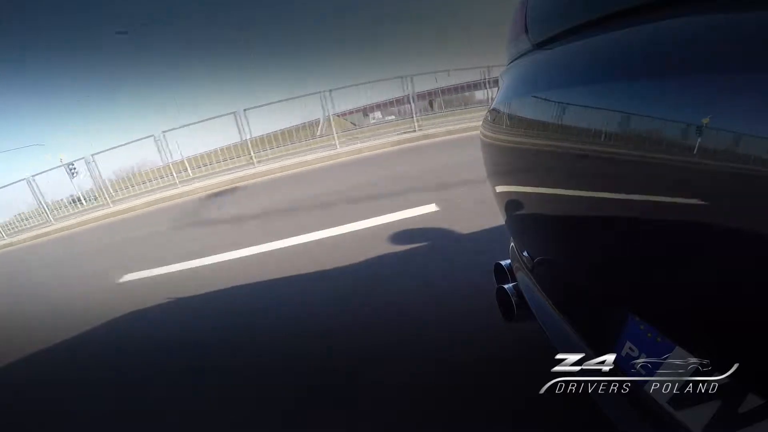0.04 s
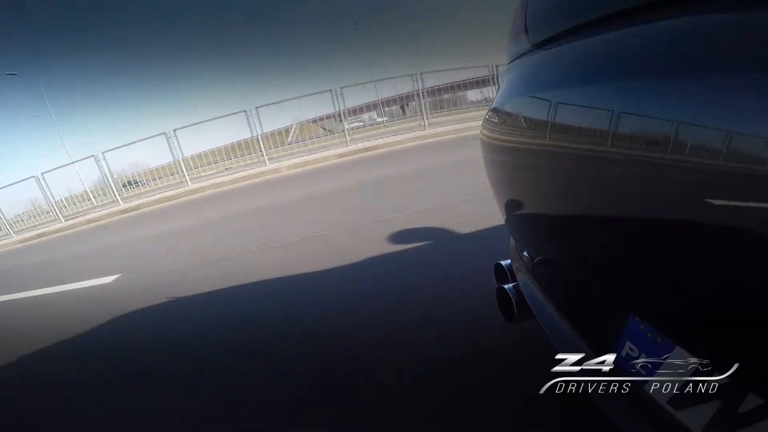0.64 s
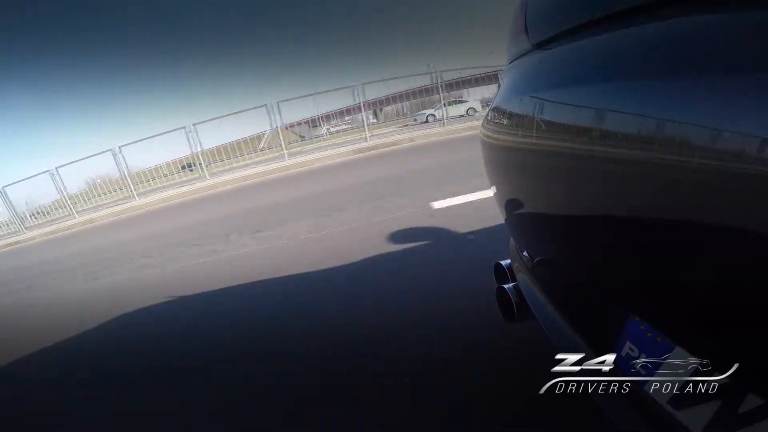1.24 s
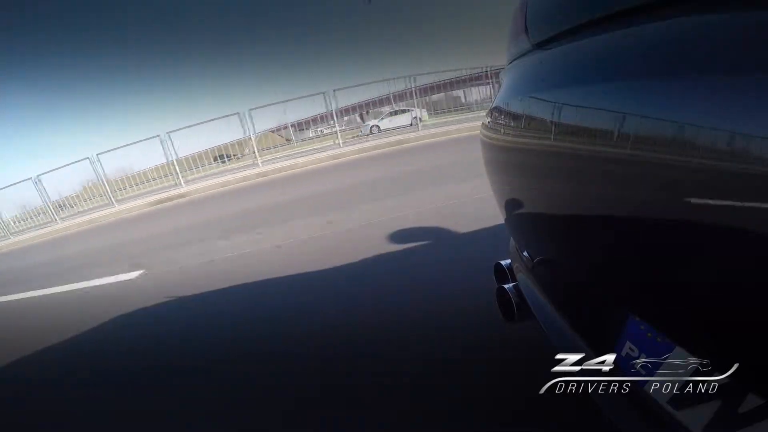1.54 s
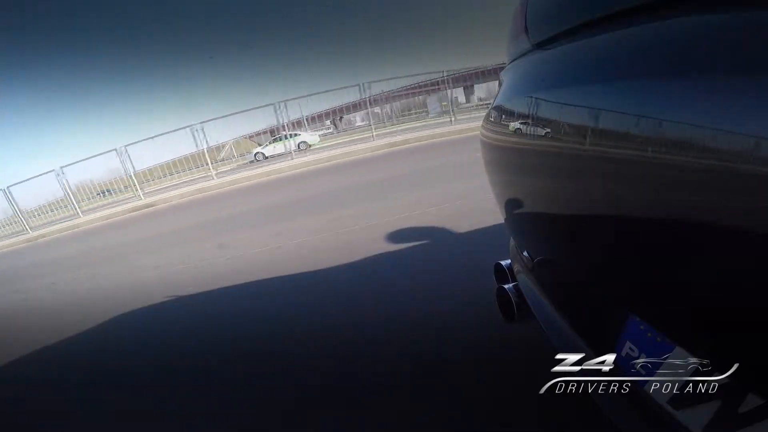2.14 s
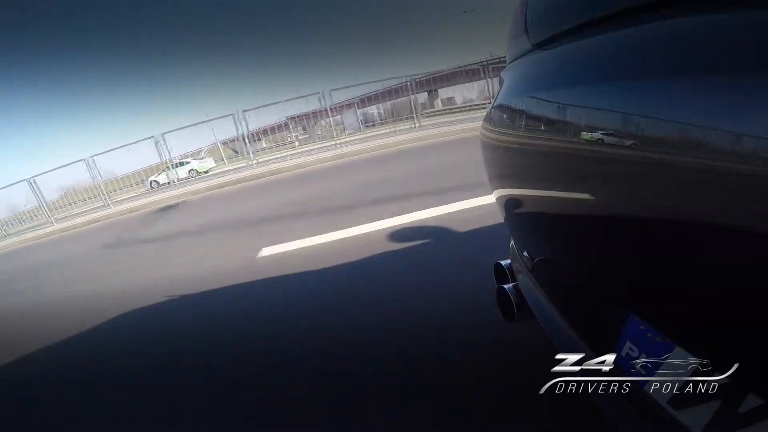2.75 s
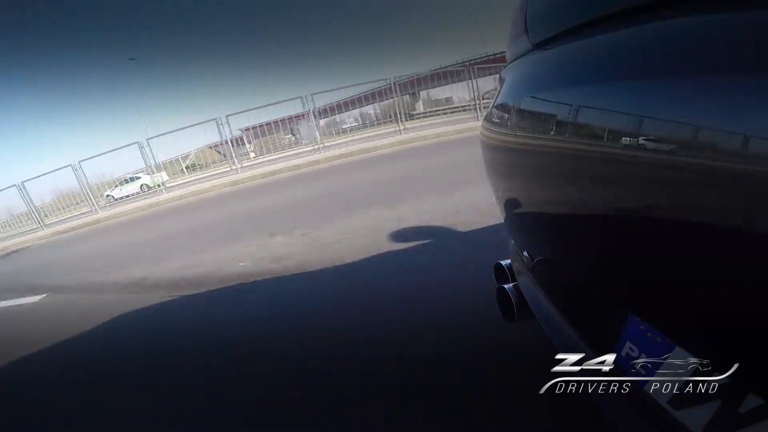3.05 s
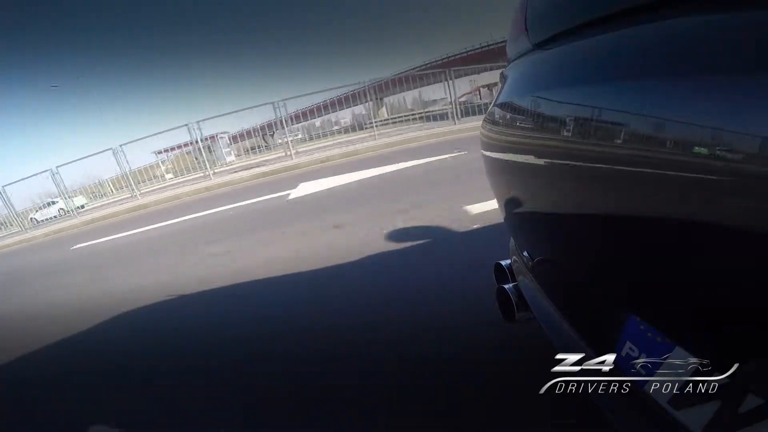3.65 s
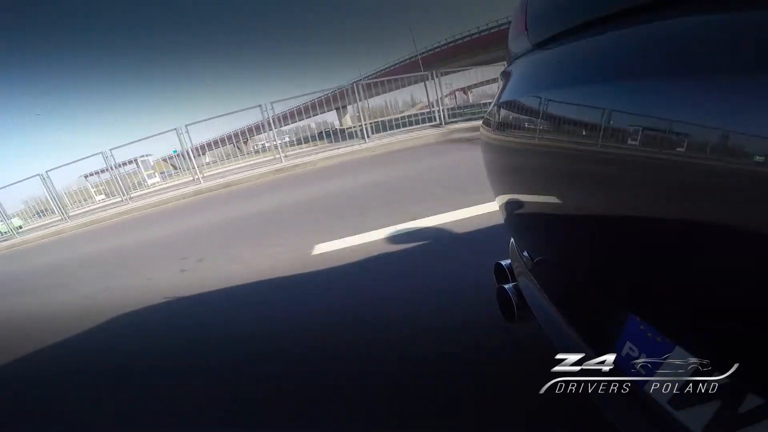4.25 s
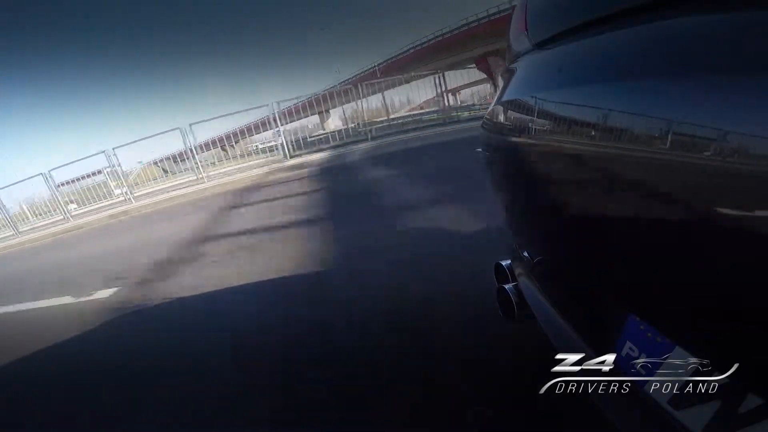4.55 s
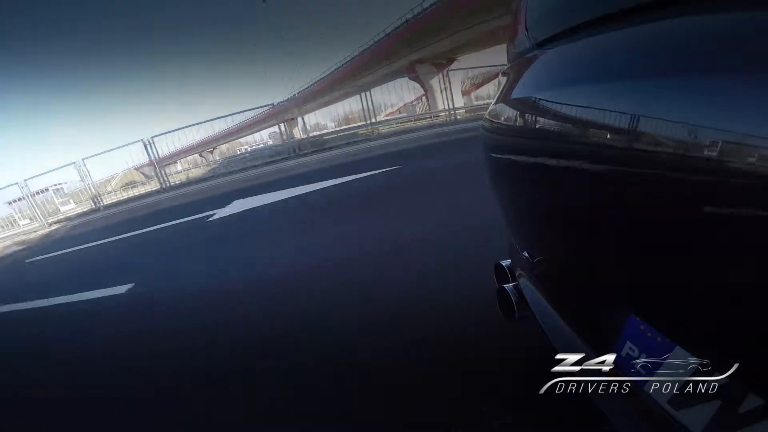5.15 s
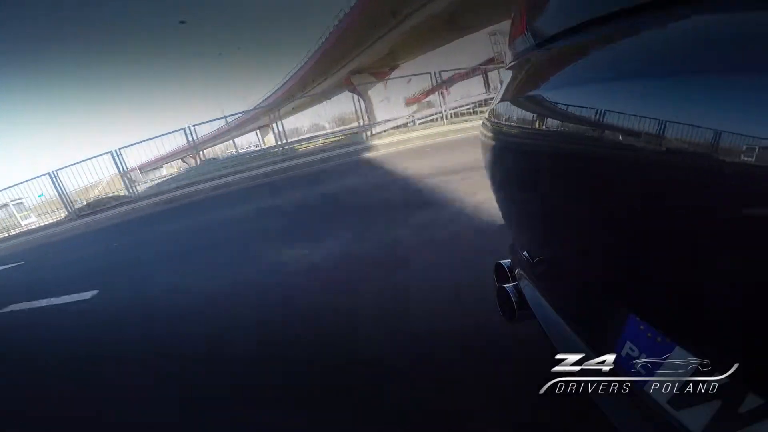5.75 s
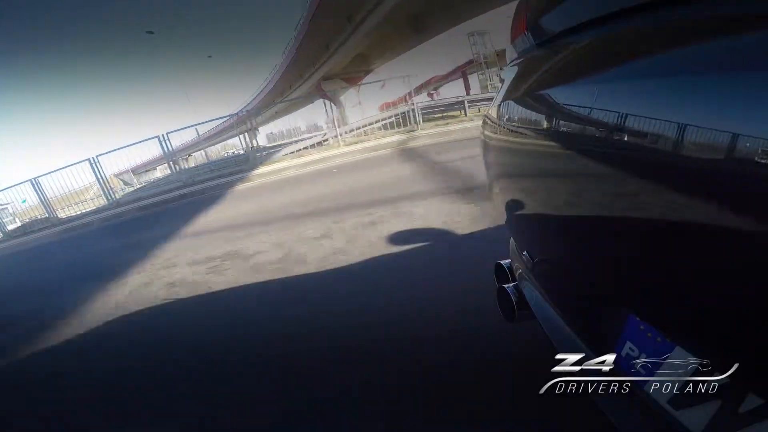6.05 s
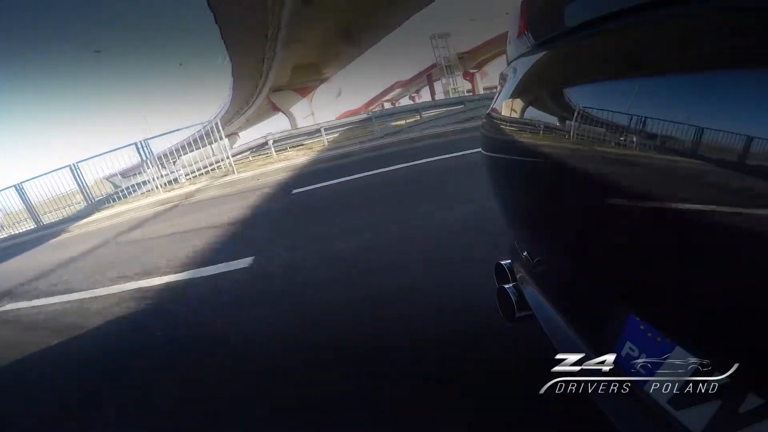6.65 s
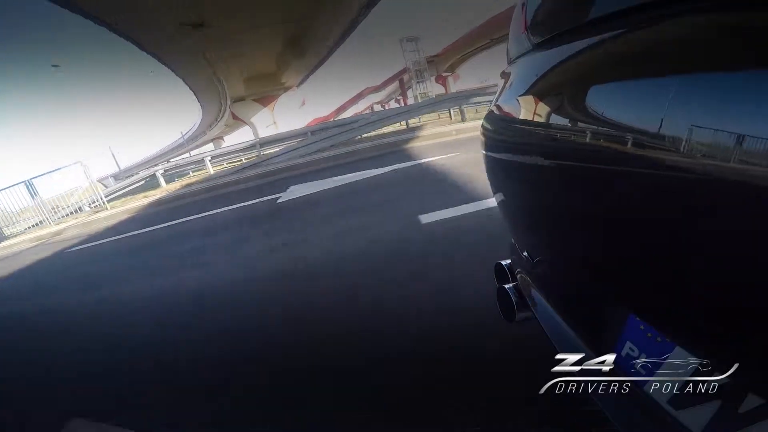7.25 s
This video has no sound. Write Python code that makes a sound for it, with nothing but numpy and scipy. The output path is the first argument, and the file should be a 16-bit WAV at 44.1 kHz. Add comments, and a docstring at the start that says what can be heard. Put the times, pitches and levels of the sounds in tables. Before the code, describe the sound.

A sports car coasts along a road, heard close up from beside the rear bumper. From the start, a deep, pulsing six-cylinder exhaust drone sinks slowly in pitch over low wind rumble and a steady, slightly boxy tyre roar with gritty hiss. At about 4.2 seconds the exhaust begins burbling unevenly and the revs fall faster, while a hollow growl swells from 4 to 5.3 seconds. Between 5.5 and 6.1 seconds one quick throttle blip raises the pitch, with sputtering and several soft, low thuds in the pipe. The drone then sinks to its lowest by the end, around 7.3 seconds. Wind gusts buffet the microphone near 4.4 and 5 seconds, and harder at 5.7 and 6.5. Faint ticks of road dust run throughout, along with a very faint, thin electrical whine that grows slightly around 4 seconds.

```python
"""A straight-six sports car's exhaust, close up, from a cased camera's microphone beside the rear bumper.
The car coasts along a road: the pulses of its two cylinder banks drone in the pipe as the revs sink,
uneven firings burble, and unburnt fuel thuds through a quick throttle blip before the drone sinks again.
Wind buffets the mount, tyres roar through the camera's case, and a thin electrical whine rides on top."""
import sys
import numpy as np
from scipy import signal
from scipy.fft import rfft, irfft
from scipy.io import wavfile
from scipy.ndimage import uniform_filter1d, minimum_filter1d

SR = 44100
rng = np.random.default_rng(int(sys.argv[2]) if len(sys.argv) > 2 else 0)


def int16_out(signal):
    """Quantize to a 16-bit WAV file."""
    q = np.round(np.clip(np.atleast_2d(signal).T, -1, 1) * 32767)
    wavfile.write(sys.argv[1], SR, q.astype(np.int16))


N = 322366
TIME = np.arange(N) / SR

# Engine speed. Each row: time in seconds, pulse rate of one cylinder bank in Hz.
BANK_RATE = [(0, 60.3), (.28, 59.3), (1, 57.5), (2.56, 54), (3.48, 52), (3.99, 50), (4.32, 46.5),
             (4.4, 45.9), (4.74, 44.6), (5.42, 37.8), (5.56, 39.2), (5.66, 41.6), (5.88, 49.3),
             (6.01, 50.8), (6.2, 46), (6.39, 42.5), (6.7, 38.4), (6.98, 34.4), (7.31, 29.6)]
# Harmonics 1 to 5 of the bank rate. Each row: strength in dB, gain at the notch in dB, notch width in Hz.
DRONE_HARMONICS = [(0, 1.5, 1), (-1, 0.5, 1), (-5.5, -17, 3), (-1.5, 0, 1), (0, -7, 36)]
# What the pipe does to a harmonic sliding through it. Each row: frequency in Hz, level in dB.
PIPE_CURVE = [(31, -20), (34.5, -13), (39, -19), (44.5, -10), (52, -9.5), (62, -8.5), (71, -10), (79, -8),
              (87, -19), (95, -34), (107, -29.5), (120, -33), (128, -36.5), (150, -27), (168, -27.5),
              (184, -34.5), (204, -38), (226, -52.5), (240, -45), (260, -62.5)]
# The drone falters as the throttle moves. Each row: middle and half length in seconds, change in dB.
THROTTLE_DIPS = [(4.38, 0.076, -4), (5.56, 0.16, -9.5), (6.07, 0.13, -7)]
# How each cylinder's strength departs from the mean, in firing order.
CYLINDER_BIAS = [-0.46, 0.38, -0.029, 0.47, 0.38, 0.94]
# Exhaust pipe resonances. Each row: centre in Hz, nominal width in Hz, gain in dB.
PIPE_MODES = [(59, 20, 3.5), (82.2, 19, -2.5), (103, 5.3, -6.5), (160.7, 6.4, -4), (189, 20, -8.5),
              (263, 130, -22.5)]
# The burble sputters harder. Each row: middle and half length in seconds, boost in dB.
BURBLE_SPUTTERS = [(0, 0.23, 4), (4.72, .12, 4.5), (5.88, 0.67, 5.5), (6.5, 0.12, 2.5)]
# Gas surges around the blip. Each row: middle and half length in seconds, boost in dB.
TAILPIPE_SURGES = [(5.33, 0.43, 13.5), (5.85, 0.19, 10.5), (6.6, .5, 12.5)]
# Colours of wind, tyre roar, rumble and hiss. Each row: frequency in Hz, relative level in dB.
WIND_SPECTRUM = [(8, -28), (16, -16), (26, -9), (34, 5), (44, -12), (60, -16), (120, -38.5)]
ROAR_SPECTRUM = [(200, -12), (470, -4.5), (600, -18.5), (680, -14.5), (780, -10), (860, -9), (1000, -5.5),
                 (1220, -3.5), (1350, -5.5), (1550, -8), (1900, -8.5), (2100, -7.5), (2400, -13.5),
                 (2900, -20.5), (4000, -43)]
RUMBLE_SPECTRUM = [(150, -17), (230, -14.5), (295, -14.5), (350, -4.5), (400, 2.5), (445, -13.5),
                   (520, -21.5), (590, -35.5), (900, -54)]
HISS_SPECTRUM = [(1800, -22), (2600, -5.5), (3100, -1.5), (3950, -4.5), (4400, -16), (5400, -17),
                 (6100, -20.5), (8000, -24), (11500, -27.5), (14000, -30), (15500, -31)]
# Gusts on the mount. Each row: middle and half length in seconds, boost in dB.
WIND_GUSTS = [(4.4, 0.51, 4.5), (5.0, 0.12, 7), (5.72, 0.38, 11.5), (6.53, 0.19, 15)]
# Resonances of the case around the microphone. Each row: centre in Hz, width in Hz, gain in dB.
CASE_MODES = [(725.5, 12, 9.5), (797, 50, -2), (926, 29, 9.5), (1074, 28, 3.5)]
# The tyres swell, as under an overpass. Each row: middle and half length in seconds, boost in dB.
TYRE_SWELLS = [(.1, .4, 4), (3.6, 0.24, 0.5), (4.9, .5, 1.5), (5.03, 0.15, 0.5), (6.42, 0.17, 1.4),
               (7.07, .1, 1.5)]
# Electrical tones. Each row: frequency in Hz, level in dB once fully grown.
WHINE_TONES = [(6294, -79), (6324, -79), (12588, -89), (12617, -73)]
# Swells of the hollow growl. Each row: middle and half length in seconds, level in dB.
GROWL_SWELLS = [(4.65, 0.67, -45), (6.46, 0.11, -48.5)]
# Unburnt fuel in the pipe. Each row: middle in seconds, pitch in Hz, half length in seconds, level in dB.
FUEL_THUDS = [(5.58, 177, 0.046, -27.5), (5.672, 30, 0.0071, -4.5), (5.79, 179, 0.015, -36),
              (5.871, 78.2, 0.014, -2.5), (5.88, 184, 0.017, -24.5), (6.012, 55.7, 0.019, -5),
              (6.035, 159, 0.027, -21.5), (6.115, 72, 0.018, -9)]


def undb(db):
    """Decibels to gain."""
    return 10 ** (np.asarray(db) / 20)


def unit(x):
    """Scale to rms 1."""
    return x / np.sqrt(np.mean(x ** 2))


def ramp(start_s, length_s):
    """A straight rise from 0 to 1 that then holds."""
    return np.clip((TIME - start_s) / length_s, 0, 1)


def swells(table, order=2):
    """Smooth rises and falls, summed; a higher order flattens their tops."""
    return sum(height * np.exp(-np.abs((TIME - middle_s) / half_s) ** order)
               for middle_s, half_s, height in table)


def wander(rate_hz):
    """Smooth random drift of rms 1."""
    hold = int(SR / rate_hz)
    steps = np.repeat(rng.standard_normal(N // hold + 1), hold)
    return unit(uniform_filter1d(uniform_filter1d(steps, hold), hold)[:N])


def noise(spectrum):
    """Noise of rms 1 with the given colour."""
    hz, db = np.transpose(spectrum)
    bin_hz = np.maximum(np.arange(N // 2 + 1) * SR / N, 1)
    colour_db = np.interp(np.log(bin_hz), np.log(hz), db, right=-200)
    return unit(irfft(rfft(rng.standard_normal(N)) * undb(colour_db), N))


def ring(x, hz, width_hz):
    """One resonance, gain 1 at its centre."""
    return signal.lfilter(*signal.iirpeak(hz, hz / width_hz, fs=SR), x)


def ring_twice(x, hz, width_hz):
    """The same resonance twice over: narrower, with steeper sides."""
    return ring(ring(x, hz, width_hz), hz, width_hz)


def throb(bank_cycles, depth):
    """A gain that pulses with the firings, two to a bank cycle."""
    return 1 + depth * np.cos(4 * np.pi * bank_cycles)


def exhaust_drone(bank_cycles, bank_hz, notch_hz=159.5):
    """The banks' even pulsing: clean harmonics that swell as they cross the pipe's resonances."""
    pipe_hz, pipe_db = np.transpose(PIPE_CURVE)
    falter_db = swells(THROTTLE_DIPS)
    drone = np.zeros(N)
    for k, (strength_db, notch_db, notch_width_hz) in enumerate(DRONE_HARMONICS, 1):
        hz = k * bank_hz
        resonance_db = np.interp(np.log(hz), np.log(pipe_hz), pipe_db)
        # near the notch the two banks cancel each other's third and fifth harmonics
        cancel_db = notch_db / (1 + ((hz - notch_hz) / notch_width_hz) ** 2)
        waver_db = 0.44 * wander(25) if k == 1 else 0.4 * wander(8.1)
        level_db = strength_db + falter_db + resonance_db + cancel_db + waver_db
        drone += undb(level_db) * np.sin(2 * np.pi * k * bank_cycles)
    return np.sqrt(2) * drone


def exhaust_burble(bank_cycles, overrun, cruise_db=-33, overrun_db=6.5, muffler_hz=300):
    """Firings differ by cylinder and by chance; the differences ring the pipe behind its muffler."""
    firings = np.flatnonzero(np.diff(np.floor(2 * bank_cycles)))
    pulses = np.zeros(N)
    pulses[firings] = rng.uniform(-1.1, 1, len(firings)) + 0.3 * np.resize(CYLINDER_BIAS, len(firings))
    rung = sum(undb(db) * ring_twice(pulses, hz, 2 * width) for hz, width, db in PIPE_MODES)
    muffled = signal.sosfilt(signal.butter(4, muffler_hz, fs=SR, output="sos"), rung)
    return unit(muffled) * undb(cruise_db + overrun_db * overrun + swells(BURBLE_SPUTTERS))


def tailpipe_gas(bank_cycles, cruise_db=-57.5):
    """Turbulent gas puffs through the tailpipe's resonance with each firing, most around the blip."""
    rush = unit(ring_twice(rng.standard_normal(N), hz=262, width_hz=110))
    return rush * throb(bank_cycles, depth=0.079) * undb(cruise_db + swells(TAILPIPE_SURGES))


def wind(slowing, cruise_db=-24, slowing_db=-10):
    """Wind buffets the mount, right at the microphone; between gusts it drops as the car slows."""
    return noise(WIND_SPECTRUM) * undb(cruise_db + swells(WIND_GUSTS) + slowing_db * slowing)


def tread_roar(slowing, case_slowing_db=-6.5, sing_cruise_db=-13):
    """The tread's roar rings the camera's case; as the car slows the case calms and the tread sings."""
    roar = noise(ROAR_SPECTRUM)
    case = sum(undb(db) * ring(roar, hz, width) for hz, width, db in CASE_MODES)
    case *= undb(case_slowing_db * slowing)
    share = undb(sing_cruise_db * (1 - slowing))
    sing = share * unit(ring(noise(ROAR_SPECTRUM), hz=1120, width_hz=130))
    return (roar + case + sing) / np.sqrt(1 + share ** 2)  # the song takes its share out of the roar


def tyres(bank_cycles, slowing, roar_db=-43, rumble_db=-47.5, hiss_db=-56, creep_db_per_s=0.4171):
    """Tyres on the road close by: roar, throbbing rumble and gritty hiss; slowing eases the first two."""
    swell_db = swells(TYRE_SWELLS)
    roar = tread_roar(slowing) * undb(roar_db + swell_db - 2 * slowing)
    flutter_db = 0.5 * wander(30)
    rumble = noise(RUMBLE_SPECTRUM) * throb(bank_cycles, depth=0.13)
    rumble *= undb(rumble_db + 0.33 * swell_db - 8 * slowing)
    hiss = unit(noise(HISS_SPECTRUM) * undb(1.4 * wander(900)))  # fast flicker gives the grain
    hiss *= undb(hiss_db + 0.98 * swell_db + 0.5 * flutter_db)
    return ((roar + rumble) * undb(flutter_db) + hiss) * undb(creep_db_per_s * TIME)


def road_grit(specks_per_s=14, strike_db=-48, scatter_db=3):
    """Specks of road dust tick against the case around the microphone."""
    strikes = rng.random(N) < specks_per_s / SR
    ticks = strikes * undb(strike_db + scatter_db * rng.uniform(-1, 1, N))
    return ring(ticks, hz=5200, width_hz=3500) + 2 * ring(ticks, hz=2200, width_hz=900)


def driveline_hum(bank_cycles, bank_hz, gear_ratio=6.41, loudest_db=-50.5, loudest_bank_hz=60):
    """A faint hum geared to the engine, fading ever faster as the revs sink."""
    level_db = loudest_db - 0.08 * (bank_hz - loudest_bank_hz) ** 2 + 0.5 * wander(9.9)
    return np.sqrt(2) * undb(level_db) * np.sin(2 * np.pi * gear_ratio * bank_cycles)


def electrical_whine(early_db=-6):
    """A thin electrical whine of steady pitch that grows a little midway."""
    tones = sum(undb(db) * np.sin(2 * np.pi * hz * TIME) for hz, db in WHINE_TONES)
    grown = ramp(start_s=3.9, length_s=0.7)
    return np.sqrt(2) * undb(early_db * (1 - grown)) * tones


def hollow_growl(bank_cycles):
    """A hollow growl throbs with the firings and swells twice, most on the way under the overpass."""
    hollow = unit(ring_twice(rng.standard_normal(N), hz=365, width_hz=130))
    gain = swells([(middle_s, half_s, undb(db)) for middle_s, half_s, db in GROWL_SWELLS], order=4)
    return hollow * throb(bank_cycles, depth=0.25) * gain


def fuel_thuds():
    """Unburnt fuel thuds in the pipe through the blip, each thud a short, soft swing of pressure."""
    pressure = np.zeros(N)
    for middle_s, hz, half_s, db in FUEL_THUDS:
        t = TIME - middle_s
        pressure -= undb(db) * np.exp(-(t / half_s) ** 2) * np.cos(2 * np.pi * hz * t)
    return pressure


def scene():
    """Exhaust, road and wind at one microphone by the bumper, led by the revs, overrun and slowing."""
    bank_hz = np.interp(TIME, *np.transpose(BANK_RATE))
    bank_cycles = np.cumsum(bank_hz) / SR
    overrun = ramp(start_s=4.12, length_s=0.28)
    slowing = ramp(start_s=5.29, length_s=1.53)
    exhaust = exhaust_drone(bank_cycles, bank_hz) + exhaust_burble(bank_cycles, overrun)
    exhaust += tailpipe_gas(bank_cycles) + fuel_thuds()
    rolling = tyres(bank_cycles, slowing) + hollow_growl(bank_cycles)
    rolling += road_grit() + driveline_hum(bank_cycles, bank_hz)
    return (exhaust + rolling + wind(slowing) + electrical_whine())[None]


def record(dry, ceiling=1.0, hold_s=0.016, top_hz=15700):
    """In the camera, a smooth limiter holds the largest swings down and the highest treble is cut."""
    hold = int(hold_s * SR)
    needed_gain = np.minimum(1, ceiling / (np.abs(dry) + 1e-9))
    held_gain = minimum_filter1d(needed_gain, 2 * hold)
    smooth_gain = uniform_filter1d(uniform_filter1d(held_gain, hold), hold)
    top_cut = signal.ellip(8, 0.2, 70, top_hz, fs=SR, output="sos")
    return signal.sosfilt(top_cut, dry * smooth_gain)


dry = scene()
out = record(dry)
int16_out(out)
```